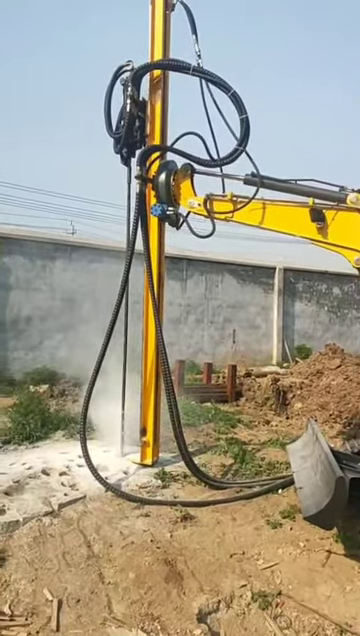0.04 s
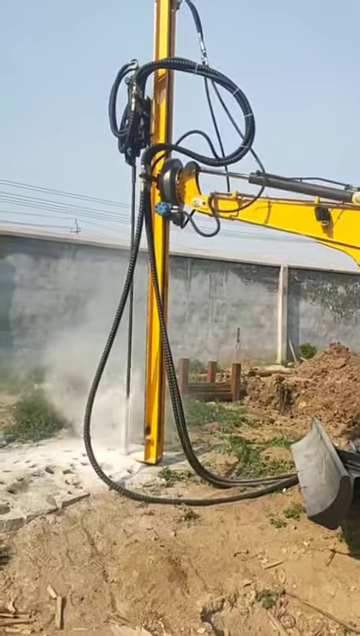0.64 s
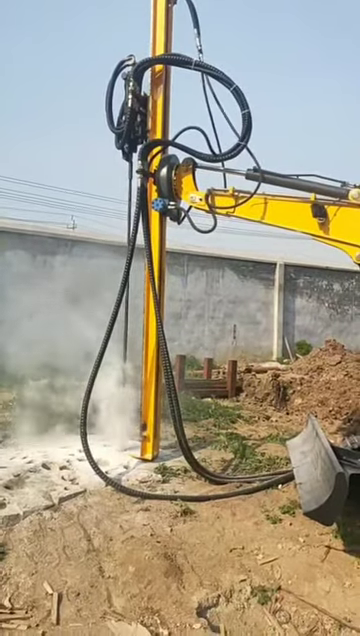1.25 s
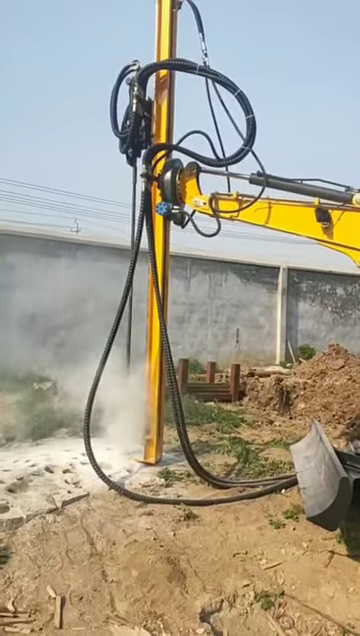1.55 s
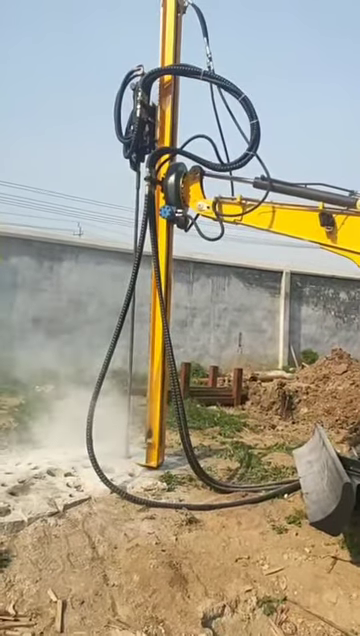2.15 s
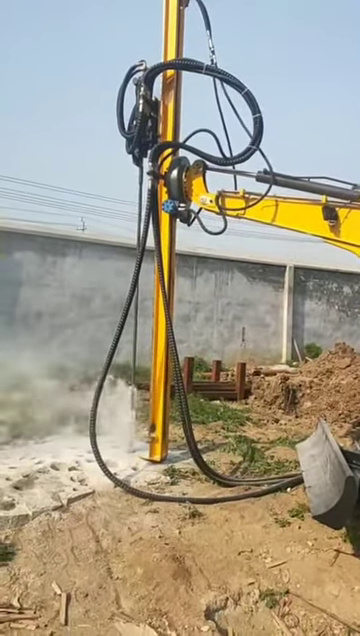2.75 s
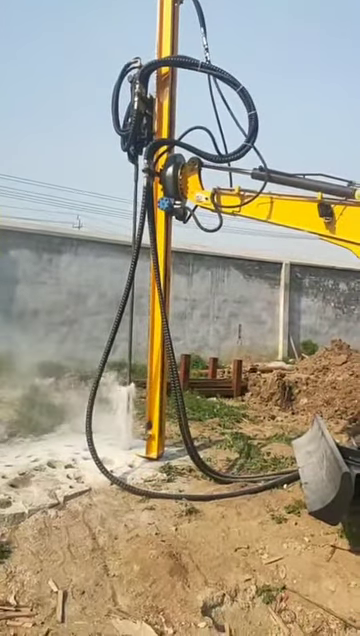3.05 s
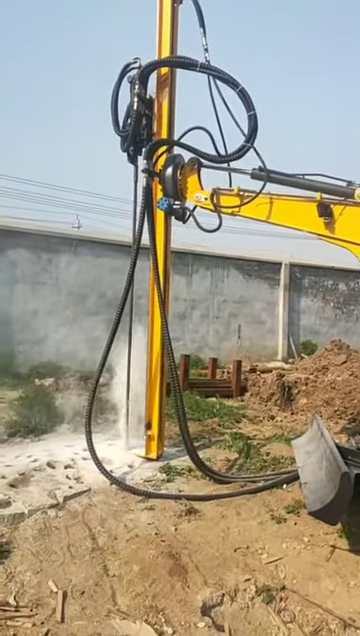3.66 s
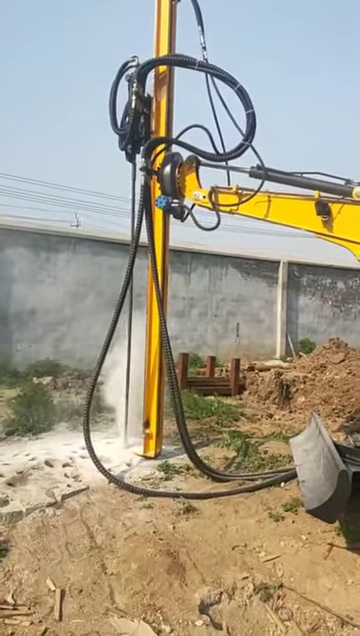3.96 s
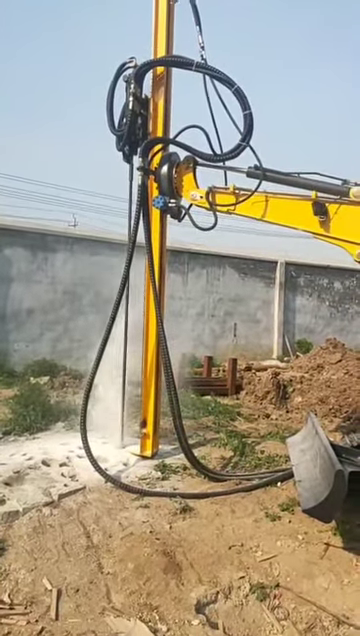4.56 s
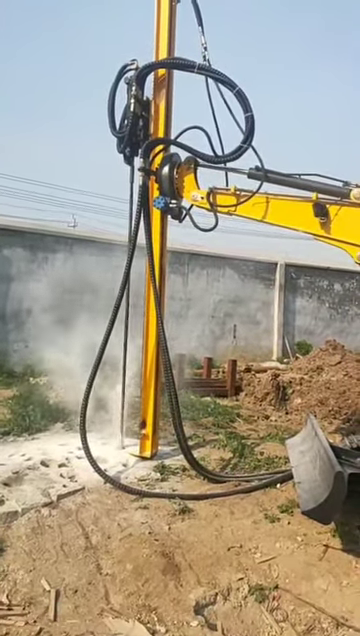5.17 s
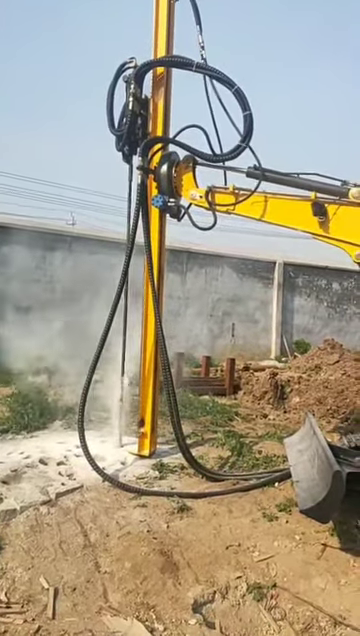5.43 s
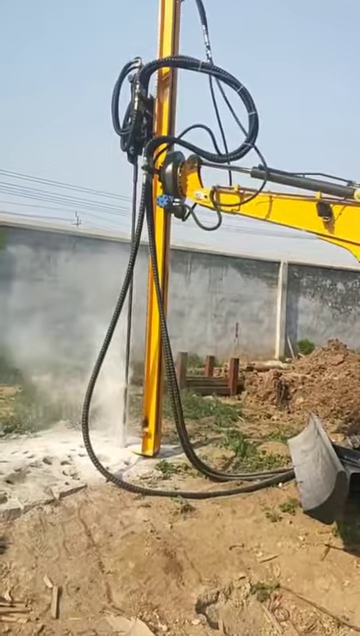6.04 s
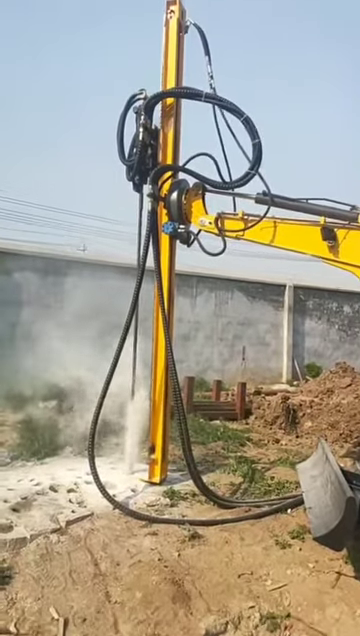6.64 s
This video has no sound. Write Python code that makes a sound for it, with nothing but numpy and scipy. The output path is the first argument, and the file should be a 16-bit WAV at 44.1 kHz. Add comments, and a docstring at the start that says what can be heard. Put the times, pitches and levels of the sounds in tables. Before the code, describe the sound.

Loud, continuous rattling of an air-powered drill pounding rock, with metallic chatter and compressed air hiss over droning machinery.

```python
"""In a walled yard, a pneumatic rock drill on an excavator mast hammers the ground, some 42 strokes a
second. Each stroke and its return bark through the hammer's exhaust and ring the drill steel; now and
then the piston stumbles, a blow lands dull or the rod clanks. Under load the hammer slows and more air
and grit hiss out of the hole. Engine and compressor drone behind; ground and wall throw the drill back."""
import sys
import numpy as np
from scipy import signal
from scipy.fft import rfft, irfft
from scipy.io import wavfile
from scipy.ndimage import uniform_filter1d, minimum_filter1d

SR = 44100
rng = np.random.default_rng(int(sys.argv[2]) if len(sys.argv) > 2 else 0)


def pcm_store(signal):
    """Save signal as 16-bit PCM."""
    levels = np.round(np.clip(np.atleast_2d(signal), -1, 1) * 32767)
    wavfile.write(sys.argv[1], SR, levels.astype(np.int16).T)


N = 299880
TIME = np.arange(N) / SR
HZ = np.fft.rfftfreq(N, 1 / SR)
LEAD = SR // 4  # pre-roll in samples: the hammer is already running


def amp(db):
    """Decibels to gain."""
    return 10 ** (np.asarray(db) / 20)


def unit(x):
    """Scales to rms 1."""
    return x / np.sqrt(np.mean(x ** 2) + 1e-20)


def curve(rows, at=TIME, column=1):
    """Follows one column of a table in straight lines along its first column."""
    columns = np.transpose(rows)
    return np.interp(at, columns[0], columns[column])


def spectrum(rows):
    """Draws each column of a table as an EQ curve over log frequency."""
    hz, *columns = np.transpose(rows)
    return np.array([np.interp(np.log(HZ + 1), np.log(hz + 1), c) for c in columns])


def noise(eq, likeness, lag_ms=0):
    """Coloured stereo noise; the part both sides share reaches the left lag_ms later."""
    right, separate = rfft(rng.standard_normal((2, N)))
    shared = likeness * right * np.exp(-2j * np.pi * HZ * lag_ms / 1000)
    left = shared + np.sqrt(1 - likeness ** 2) * separate
    return unit(irfft(np.array([left, right]) * amp(spectrum(eq)), N))


def wander(rate_hz):
    """Smooth random drift of rms 1."""
    return unit(irfft(rfft(rng.standard_normal(N)) * np.exp(-(HZ / rate_hz) ** 2), N))


def ring(modes, size=8000):
    """The ring of one strike: a sum of dying sines."""
    t = np.arange(size) / SR
    return sum(amp(db - 60 * t / t60) * np.sin(2 * np.pi * hz * t) for hz, db, t60 in modes)


def blows(times, jitter_ms, spread_db):
    """A train of impulses, each a little off in time and force."""
    late, force = rng.standard_normal((len(times), 2)).T
    at = np.round((times + late * jitter_ms / 1000) * SR).astype(int) + LEAD
    return np.bincount(np.clip(at, 0, N + LEAD), amp(spread_db * force), N + LEAD + 1)[:-1]


def bursts(train, decay_ms):
    """An envelope of rms 1 that snaps open at each impulse and dies away."""
    return unit(signal.lfilter([1], [1, -np.exp(-1000 / (decay_ms * SR))], train)[LEAD:])


# the hammer's tempo: time_s, strokes_per_s
STROKE_RATE = [(0.0, 42.0), (0.4, 42.25), (1.0, 41.68), (1.2, 42.05), (1.8, 42.56), (2.0, 42.37),
               (2.4, 42.95), (3.4, 41.67), (4.2, 41.97), (4.6, 42.6), (4.8, 42.27), (5.0, 42.49),
               (5.4, 41.91), (5.6, 42.0), (5.8, 41.77), (6.2, 41.67), (6.8, 42.46)]
# the piston rebounds early (+) or late (-): start_s, shift_cycles
PISTON_STUMBLES = [(0.11, -0.008), (1.722, 0.005), (1.933, 0.058), (2.144, 0.029), (3.059, 0.025),
                   (3.66, -0.022), (4.702, 0.075), (4.771, 0.063), (5.815, -0.008), (6.2, -0.015)]
def piston(return_ms=9.67, haste_ms_per_hz=0.7):
    """The rhythm: a working stroke every cycle, and a looser return after each."""
    t = np.arange(-LEAD, N) / SR
    cycles = np.cumsum(curve(STROKE_RATE, t)) / SR
    slip = sum(shift * np.clip((t - start) * 100, 0, 1) for start, shift in PISTON_STUMBLES)
    cycles = cycles - cycles[LEAD] + slip
    times = t[1:][np.diff(np.floor(cycles)) > 0]
    rate, shaky = curve(STROKE_RATE, times), stumbling(times)
    back_ms = return_ms - haste_ms_per_hz * (rate - rate.mean())  # a faster piston comes back sooner
    strokes = blows(times, jitter_ms=0.046 + 0.091 * shaky, spread_db=0.1)
    returns = blows(times + back_ms / 1000, jitter_ms=0.36 + shaky, spread_db=2.0)
    return strokes, returns


def stumbling(t, settle_s=0.055):
    """Near 1 while the piston stumbles, 0 while it runs true."""
    return np.max([np.exp(-((t - start) / settle_s) ** 2) for start, _ in PISTON_STUMBLES], axis=0)


def load(heavy_sag_hz=0.64):
    """From -1 to 1: the harder the bit bites, the slower the hammer runs."""
    rate = curve(STROKE_RATE)
    return np.tanh((rate.mean() - rate) / heavy_sag_hz)


# the body of the bark: pitch_hz, level_db, t60_s; most rows are resonances of casing and exhaust, while the
# narrow, long-ringing ones near 377, 755 and 828 Hz carry the yard's lingering echo
BARK_MODES = [(144, -36, 0.42), (164.3, -20, 0.13), (207.9, -20, 0.077), (278.4, -14.5, 0.044),
              (377.4, -32.5, 0.6), (419, -15, 0.025), (432.8, -36, 0.17), (557.2, -8, 0.099),
              (592.6, -17.5, 0.15), (635, -21, 0.12), (707.8, -24.5, 0.14), (754.8, -34.5, 0.32),
              (828.4, -33.5, 0.8), (986, -32.5, 0.11), (1106, -57, 0.37)]
def hammer(strokes, returns, level_db=-0.1, load_db=0.05, low_cut_hz=137):
    """Stroke and return bark through the casing, which radiates little bass; near surfaces slap back."""
    bark = signal.oaconvolve(dull_duds(strokes) + 0.15 * returns, ring(BARK_MODES))[:N + LEAD]
    bark = signal.sosfilt(signal.butter(2, low_cut_hz, "high", fs=SR, output="sos"), bark)
    stereo = np.array([np.roll(bark, 3), bark])  # reaches the left 3 samples later
    return amp(level_db + load_db * load()) * reflect(stereo)[:, LEAD:]


# the colour of the turbulence in each puff: frequency_hz, relative_db
PUFF_EQ = [(80, -33), (200, 0), (300, -20), (450, 4.5), (650, 3), (850, 12.5), (1100, -25), (2000, 0),
           (5000, -54)]
def exhaust(strokes, returns, level_db=-28.5, sputter_db=3, load_db=4.0):
    """Spent air leaves in turbulent puffs, louder when the piston labours or stumbles."""
    puffs = noise(PUFF_EQ, likeness=0.15) * bursts(strokes + 0.49 * returns, decay_ms=14)
    return amp(level_db + sputter_db * stumbling(TIME) + load_db * load()) * puffs


# the ring of the drill steel: pitch_hz, relative_db, t60_s
STEEL_MODES = [(1337, -34.5, 0.6), (1492, -18, 0.12), (2310, -0.5, 0.024), (2520, -13, 0.085),
               (2710, 1.5, 0.02), (3000, -12.5, 0.056), (3330, -13.5, 0.061), (3354, -8, 0.065),
               (3837, -8, 0.054), (4016, 0, 0.082)]
# how hard drilling drives that ring as the rod sinks: pitch_hz, drive_db, full_load_db, sink_db_per_s
STEEL_DRIVE = [(2330, -26.5, -0.5, 0.5), (2730, -29, -1.5, 0.06), (3300, -28, -0.5, -1.96),
               (3800, -39.5, -5, 1.5), (4030, -37.5, 5, -0.6)]
def steel(strokes, returns, level_db=-20.0, right_db=-6.5, turn_db=2.5, turn_hz=16):
    """The rod chatters in its chuck after every stroke; as it turns, one mode or another rings out."""
    chatter = rng.standard_normal((2, N)) * bursts(strokes + 0.82 * returns, decay_ms=5.2)
    chatter = chatter + 0.057 * chatter[::-1]  # a little bleed between the sides
    rod, effort = np.zeros((2, N)), load()
    for mode in STEEL_MODES:
        pitch_hz = mode[0]
        drive_db, load_db, sink_db_per_s = (curve(STEEL_DRIVE, pitch_hz, k) for k in (1, 2, 3))
        bite_db = drive_db + load_db * effort + sink_db_per_s * TIME
        accent_db = clanks(pitch_hz) + turn_db * wander(turn_hz)
        rod += signal.oaconvolve(chatter * amp(bite_db + accent_db), ring([mode])[None], axes=1)[:, :N]
    return amp(level_db) * unit(rod) * amp([[0], [right_db]])


# the colour of the air hiss: frequency_hz, left_relative_db, right_relative_db
HISS_EQ = [(150, -66, -74), (1010, -74.5, -60.5), (1700, -56.5, -56), (2390, -49.5, -55),
           (2770, -51.5, -57.5), (3870, -54, -60.5), (4480, -59.5, -66.5), (5800, -62.5, -58.5),
           (6990, -67, -48), (7840, -68.5, -56.5), (10300, -72.5, -67.5), (13000, -65.5, -68),
           (14500, -78, -71), (15700, -95, -66)]
# its stereo image, from 0 (wide) to 1 (both sides alike): frequency_hz, likeness
HISS_IMAGE = [(200, 0.8), (800, 0), (1200, 0), (2800, 1), (4500, 0.17), (8000, 0.22), (14000, 0)]
def flushing_air(strokes, returns, level_db=-17.0, pulsed=0.39, load_db=0.96, gust_db=0.94, gust_hz=18):
    """Air hisses from hole and hammer, combed by near surfaces, swelling with each blow and the load."""
    throb = unit(1 - pulsed + pulsed * bursts(strokes + 0.3 * returns, decay_ms=14.0))
    hiss = noise(HISS_EQ, likeness=spectrum(HISS_IMAGE)[0], lag_ms=0.076)
    combed = unit(reflect(hiss, wet=0.26))
    swell_db = load_db * load() + 0.44 * spurts() + gust_db * wander(gust_hz)
    return combed * throb * amp(level_db + swell_db)


def grit(strokes, level_db=-39, chips_per_s=1200, band_hz=(9500, 13800), load_db=2, clump_db=3):
    """Rock chips leave the hole in spurts and tick against rod and mast, loudest just after a stroke."""
    chips = rng.random(N + LEAD) < chips_per_s / SR
    force_db = 4 * np.minimum(rng.exponential(1, N + LEAD), 4)
    ticks = rng.standard_normal((2, N)) * bursts(chips * amp(force_db), decay_ms=0.31)
    pulse = 0.76 + bursts(strokes, decay_ms=5.1)
    spray = ticks * pulse * amp(load_db * load() + 2.7 * spurts() + clump_db * wander(rate_hz=10))
    sizzle = signal.sosfilt(signal.butter(1, band_hz, "band", fs=SR, output="sos"), spray)
    return amp(level_db) * unit(sizzle)


# the colour of the machine bed: frequency_hz, relative_db
DRONE_EQ = [(5, 0), (20, -8), (45, -6), (65, -18), (110, -16), (200, -19), (500, -1), (1200, -17.5),
            (4000, -44)]
def engine_drone(level_db=-23):
    """The excavator's engine and compressor lay a wide, steady bed of noise."""
    return amp(level_db) * noise(DRONE_EQ, likeness=0.033)


# early reflections off ground, mast, boom and wall: delay_ms, left_gain, right_gain
EARLY_ECHOES = [(3.11, .63, .57), (4.48, .75, .51), (9.5, .31, .54), (30.71, .28, .2)]
def reflect(x, wet=1):
    """Each near surface adds one delayed copy of the sound."""
    return x + wet * sum(np.array(gains)[:, None] * np.roll(x, round(ms * SR / 1000), axis=1)
                         for ms, *gains in EARLY_ECHOES)


def yard_echo(x, level_db=-19, t60_s=1.0, predelay_s=0.065, size=16000):
    """The wall and the earth heaps scatter the sound into a short, diffuse tail."""
    t = np.arange(size) / SR
    tail = rng.standard_normal((2, size)) * (t > predelay_s) * amp(-60 * t / t60_s)
    return amp(level_db) * signal.oaconvolve(x, tail / np.linalg.norm(tail[0]), axes=1)[:, :N]


# moments when the bit finds no firm rock: middle_s, length_s
DUD_BLOWS = [(.118, .024), (.475, .024), (.64, .024), (.712, .024), (2.16, .024), (3.675, .045),
             (4.29, .024), (4.783, .024), (5.83, .024), (6.04, .024), (6.21, .075), (6.78, .045)]
def dull_duds(strokes, high_cut_hz=510, thud_db=1.5):
    """A blow that misses firm rock keeps its low thump but loses the bark above it."""
    t = np.arange(-LEAD, N) / SR
    dud = np.any([abs(t - middle) < length / 2 for middle, length in DUD_BLOWS], axis=0)
    thuds = signal.sosfilt(signal.butter(2, high_cut_hz, fs=SR, output="sos"), strokes * dud)
    return strokes * ~dud + amp(thud_db) * thuds


# spurts of air and dust: peak_s, strength (negative for a dip)
DUST_SPURTS = [(.65, 5), (.92, -2), (1.19, 4), (2.97, 6), (3.67, 5), (6.03, 0)]
def spurts(rise_s=0.016, fall_s=0.048):
    """The hole clears: a fast swell and slower fall that rides the level of hiss and grit."""
    return sum(strength * np.exp(np.minimum((TIME - peak) / rise_s, (peak - TIME) / fall_s))
               for peak, strength in DUST_SPURTS)


# hard knocks of the rod: peak_s, pitch_hz, boost_db
ROD_CLANKS = [(1.72, 3350, 7), (2.84, 2340, 5), (2.97, 4020, 10), (3.25, 4020, 4), (3.81, 2340, 5),
              (3.9, 4020, 11), (3.93, 2340, 1), (4.39, 2320, 6.5), (4.78, 2340, 3), (5.08, 2340, 5),
              (6.5, 4020, 3)]
def clanks(pitch_hz, width_s=0.036, width_hz=110):
    """A brief boost in dB for one steel mode: a hard knock makes the modes near its pitch clank out."""
    return sum(db * np.exp(-((TIME - peak) / width_s) ** 2 - ((pitch_hz - hz) / width_hz) ** 2)
               for peak, hz, db in ROD_CLANKS)


def scene():
    """The drill, its air and its echoes over the drone of the machines behind it."""
    strokes, returns = piston()
    drill = hammer(strokes, returns) + exhaust(strokes, returns) + steel(strokes, returns)
    bed = engine_drone()
    return drill + yard_echo(drill) + flushing_air(strokes, returns) + grit(strokes) + bed


def record(dry, ceiling=0.8, high_cut_hz=15800):
    """A fast limiter holds down the crest of each bark; a steep high cut trims the very top."""
    wanted = ceiling / np.maximum(abs(dry), ceiling)
    # the gain dips ahead of each peak and recovers within a few ms
    gain = uniform_filter1d(minimum_filter1d(wanted, size=130, axis=1), size=130, axis=1)
    high_cut = signal.firwin(1023, high_cut_hz, window=("kaiser", 9), fs=SR)
    return signal.oaconvolve(dry * gain, high_cut[None], "same")


dry = scene()
out = record(dry)
pcm_store(out)
```